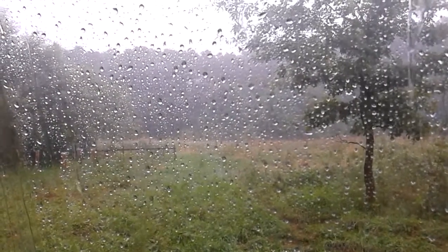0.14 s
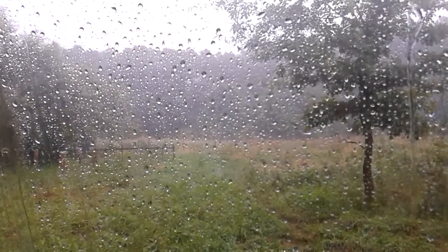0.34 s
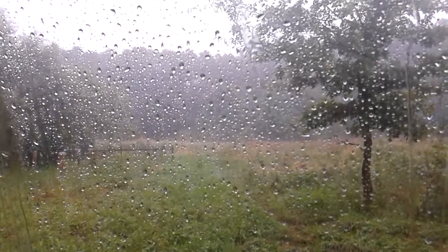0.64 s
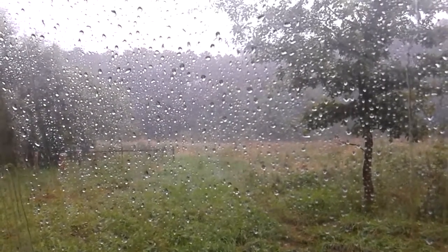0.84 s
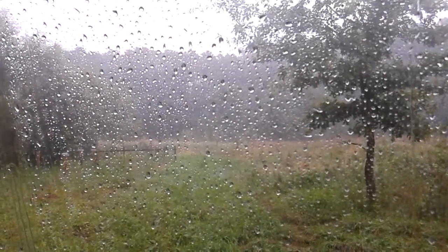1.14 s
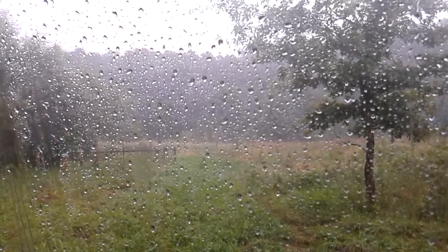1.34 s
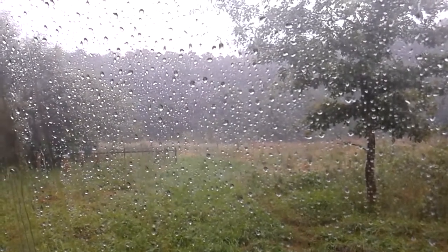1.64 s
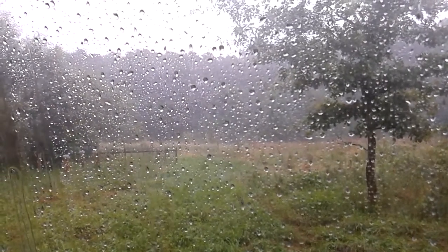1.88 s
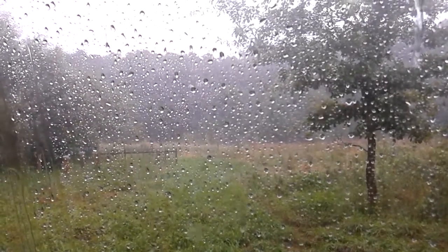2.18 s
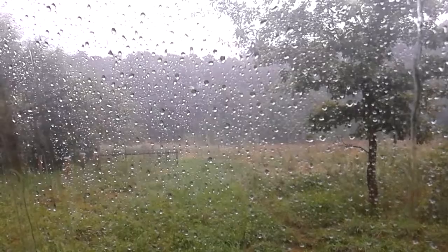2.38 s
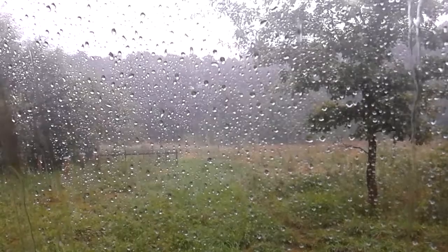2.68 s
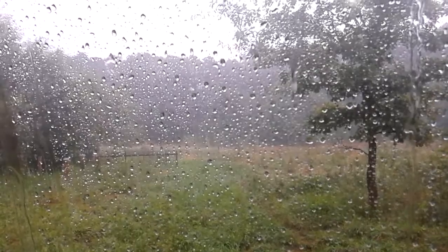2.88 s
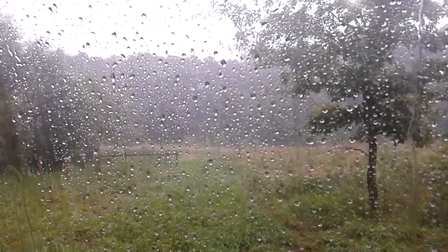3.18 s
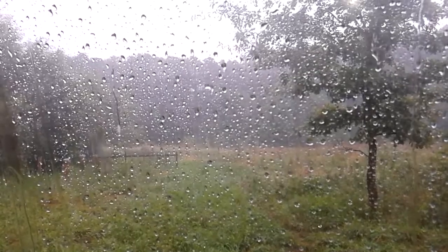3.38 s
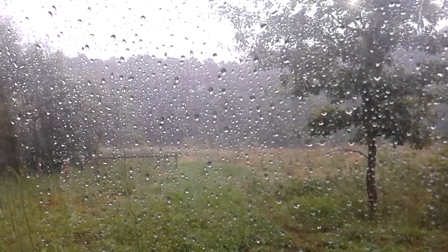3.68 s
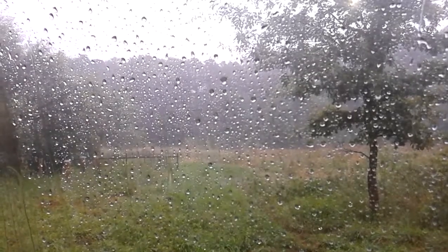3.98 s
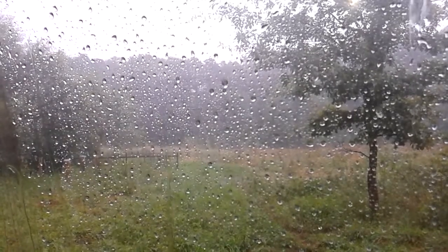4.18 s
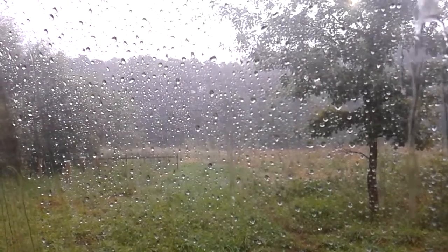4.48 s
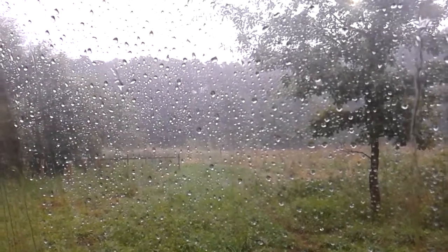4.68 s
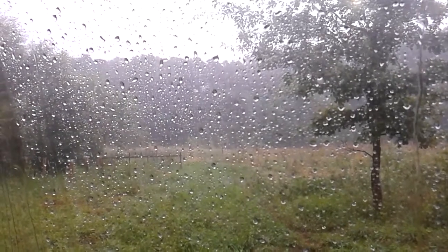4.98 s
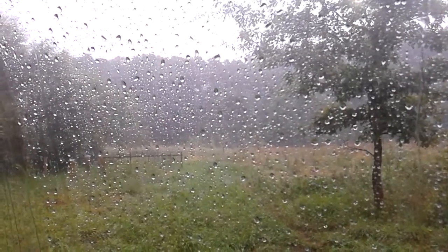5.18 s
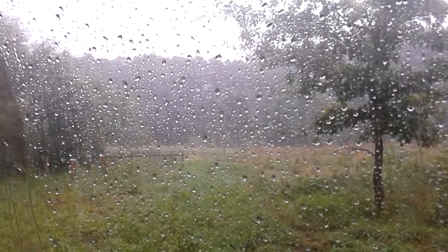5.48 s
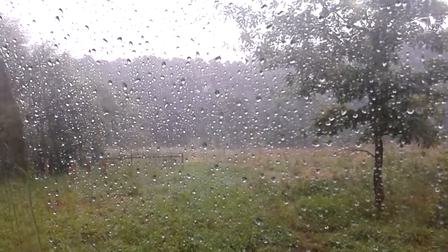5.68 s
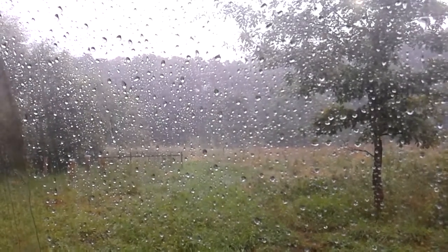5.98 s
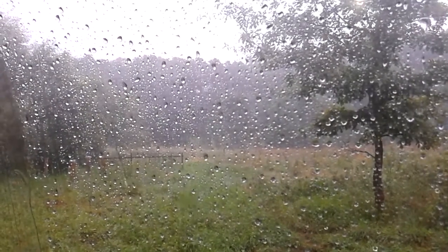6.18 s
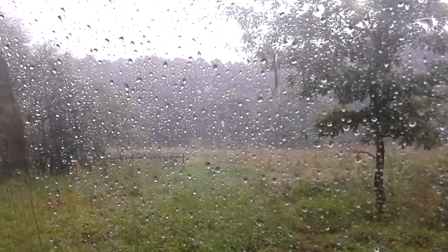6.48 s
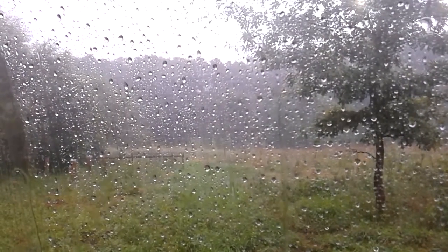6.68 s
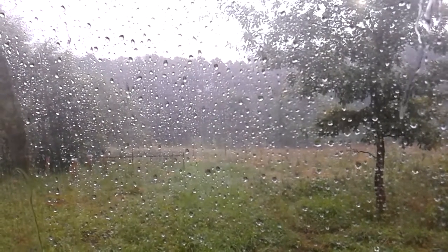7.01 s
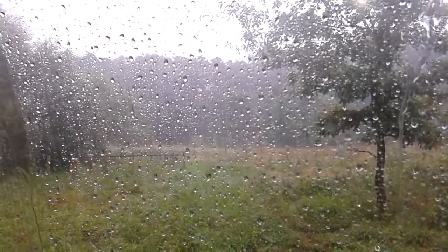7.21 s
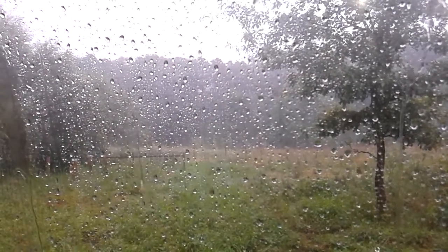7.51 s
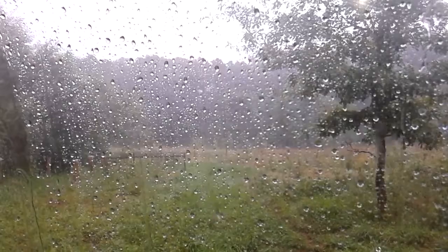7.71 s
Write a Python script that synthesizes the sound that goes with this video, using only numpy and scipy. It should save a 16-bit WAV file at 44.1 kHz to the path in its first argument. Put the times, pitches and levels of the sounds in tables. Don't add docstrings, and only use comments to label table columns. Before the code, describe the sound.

Inside a closed vehicle, a steady downpour rattles the roof and glass, punctuated by irregular hard knocks, wet smacks and small hollow booms.

```python
import sys
import numpy as np
from scipy import signal
from scipy.fft import rfft, irfft, next_fast_len
from scipy.io import wavfile
from scipy.ndimage import uniform_filter1d

SR = 44100
rng = np.random.default_rng(int(sys.argv[2]) if len(sys.argv) > 2 else 0)


def generate_wav(sig):
    pcm = np.round(np.clip(np.atleast_2d(sig).T, -1, 1) * 32767).astype(np.int16)
    wavfile.write(sys.argv[1], SR, pcm)


def voltage_ratio(level):
    return 10 ** (np.asarray(level, float) / 20)


N = 346185

# (frequency [Hz], level [dB])
ROOF_COLOUR = [(150, -27), (400, -6.5), (800, -2.5), (1700, -1.5), (3000, -6.5), (6000, -23.5),
               (12000, -43)]


def rms_one(x):
    return x / np.sqrt(np.mean(x ** 2) + 1e-20)


def at_hz(points, hz):
    table_hz, values = np.transpose(points)
    return np.interp(np.log(hz), np.log(table_hz), values)


def drift(rate_hz):
    r = np.exp(-80 * np.pi * rate_hz / SR)
    noise = rng.standard_normal(N // 40 + 2002)
    slow = signal.lfilter([1], [1, -2 * r, r * r], noise)[2000:]
    return np.interp(np.arange(N) / 40, np.arange(len(slow)), rms_one(slow))


def causal(spectrum, size):
    hz = np.maximum(np.arange(size // 2 + 1) * SR / size, 1)
    cepstrum = irfft(np.log(voltage_ratio(at_hz(spectrum, hz))), size)
    cepstrum[1:size // 2] *= 2
    cepstrum[size // 2 + 1:] = 0
    return np.exp(rfft(cepstrum))


def strikes(spectrum, t60_scale, crack):
    # (frequency [Hz], t60 [s])
    panel_t60 = [(100, 0.13), (500, 0.1), (2000, 0.099), (8000, 0.091)]
    t = np.arange(SR // 4) / SR
    scale = np.reshape(t60_scale, (-1, 1))
    white = rng.standard_normal((2, len(scale), len(t)))
    out = 0
    edges = 70 * 2 ** np.arange(0, 8.1, 1 / 3)
    for k, (low, high) in enumerate(zip(edges, edges[1:])):
        t60 = scale * at_hz(panel_t60, np.sqrt(low * high))
        dying = white[k % 2] * voltage_ratio(-60 * t / t60)
        dying /= np.linalg.norm(dying, axis=1, keepdims=True)
        dying[:, 0] += crack
        band = signal.butter(2, [low, high], "band", fs=SR, output="sos")
        out = out + signal.sosfilt(band, dying)
    size = SR // 2
    out = irfft(rfft(out, size) * causal(spectrum, size), size)[:, :len(t)]
    return out / np.linalg.norm(out, axis=1, keepdims=True)


def patter(spectrum, per_s, spread_db, clump_db, t60_scale, crack):
    places = 14
    sizes_db = spread_db * np.minimum(rng.exponential(1, N), 5) + clump_db * drift(23.3)
    sizes = voltage_ratio(sizes_db) * rng.choice([-1, 1], N)
    falls = rng.random(N) < per_s / SR
    drops = sizes * falls * (rng.integers(0, places, N) == np.arange(places)[:, None])
    voices = strikes(spectrum, np.full(places, t60_scale), crack)
    size = next_fast_len(N + voices.shape[1])
    ringing = irfft(np.sum(rfft(drops, size) * rfft(voices, size), axis=0), size)
    ringing[:size - N] += ringing[N:]
    return rms_one(ringing[:N])


def lone_drops(times, peaks_db, voices):
    out = np.zeros(N + voices.shape[1])
    for s, db, voice in zip(times, peaks_db, voices):
        start = round(s * SR)
        out[start:start + len(voice)] += voltage_ratio(db) * voice / np.abs(voice).max()
    return out[:N]


def pocks(hz):
    cycles = hz[:, None] * np.arange(SR // 20) / SR
    decay = voltage_ratio(-60 * cycles / 6.9)
    pock = np.sin(2 * np.pi * cycles) * decay * np.minimum(cycles / 0.47, 1)
    return signal.sosfilt(signal.butter(2, 300, "high", fs=SR, output="sos"), pock)


def patches(s, db, hz, octaves, rise_s, t60, count):
    t = np.arange(SR // 12) / SR
    low, high, phase = rng.random((3, len(s), count, 1))
    mode_hz = np.reshape(hz, (-1, 1, 1)) * 2 ** (octaves * (low - high))
    modes = np.sin(2 * np.pi * (mode_hz * t + phase)).sum(axis=1)
    envelope = np.minimum(t / rise_s, 1) * voltage_ratio(-60 * np.maximum(t - rise_s, 0) / t60)
    return lone_drops(s, db, modes * envelope)


def sheets(t):
    # (time [s], lift [dB], lasting [s])
    gusts = [(0.085, 3.5, 0.061), (0.26, 4.5, 0.014), (0.49, 3, 0.052), (0.57, 3, 0.061),
             (0.70, 2.5, 0.067), (0.93, 3, 0.061), (1.16, 3, 0.029), (1.53, 3.5, 0.045), (1.87, 1.5, 0.044),
             (2.01, 3.5, 0.014), (2.078, 3.5, 0.043), (2.375, 3, 0.02), (2.7, 3, 0.051), (2.8, 3.5, 0.071),
             (3.48, 4, 0.025), (3.628, 4.5, 0.096), (3.851, 4, 0.042), (4.1, 4.5, 0.045), (4.18, 3, 0.062),
             (4.34, 1.5, 0.019), (4.438, 5, 0.02), (4.88, 6.5, 0.095), (5.13, 1.5, 0.089),
             (5.64, 2.5, 0.082), (5.84, 3, 0.15), (6.1, 3, 0.11), (6.17, 2, 0.084), (6.43, 2.5, 0.055),
             (6.731, 1.5, 0.086), (7.15, 4, 0.017)]
    rise_s, fall_s = 0.008, 0.02
    start, db, lasting = np.transpose(gusts)[:, :, None]
    rise = np.clip((t - start) / rise_s, 0, 1)
    fall = np.exp(-np.maximum(t - start - lasting, 0) / fall_s)
    return np.max(db * rise * fall, axis=0)


def lulls(t):
    # (end time [s], depth [dB], negative for a swell, lasting [s])
    gaps = [(0.568, 4, 0.028), (0.686, 5, 0.023), (0.942, 2, 0.037), (1.135, 2, 0.032), (1.535, 4.5, 0.055),
            (1.80, 0.5, .06), (2.0, 3.5, 0.071), (2.376, 2.5, 0.059), (3.368, 4, 0.03), (3.63, 0, .03),
            (3.855, 1, 0.046), (4.09, 1.5, .04), (4.883, 3, 0.034), (5.137, -2, .04), (5.5, -2, 0.034),
            (5.84, 1.5, 0.073), (5.895, 3, 0.011), (6.108, 0.5, 0.057), (6.435, 0.5, 0.031),
            (6.72, 4.5, .06), (6.968, 0.5, .04), (7.33, 1, 0.08), (7.604, 3, 0.075)]
    end, db, lasting = np.transpose(gaps)[:, :, None]
    return -np.sum(db * np.clip(1 - (end - t) / lasting, 0, 1) * (t < end), axis=0)


def downpour():
    # (time [s], drumming level [dB])
    strength = [(0.0, -24), (0.94, -23), (1.66, -25), (2.23, -22.5), (2.62, -23), (3.21, -24.5),
                (3.65, -24), (4.37, -22.5), (4.72, -25), (4.94, -26.5), (5.07, -22.5), (5.992, -26),
                (6.27, -23), (7.41, -25), (7.56, -22.5), (7.85, -24)]
    # (frequency [Hz], level [dB per Hz])
    panel_colour = [(53, -57), (90, -25), (118, -12), (292, -8), (340, -2), (429, -3), (721, 1),
                    (1000, -1.5), (1530, -3), (1650, -1), (3710, -12), (4600, -20.5), (5500, -22),
                    (6000, -26.5), (6870, -31.5), (9000, -35.5), (11700, -53), (19800, -70.5)]
    # (frequency [Hz], level [dB per Hz])
    glass_colour = [(1500, -29.5), (4000, 1.5), (6900, -11), (8490, -7.5), (10800, -15.5), (13700, -22),
                    (14700, -16.5), (15800, -19)]
    t = np.arange(N) / SR
    coarse_t = t[::32]
    s, floor_db = np.transpose(strength)
    drum_db = np.interp(t, s, floor_db) + np.interp(t, coarse_t, sheets(coarse_t) + lulls(coarse_t))
    mean_db = drum_db.mean()
    spray_db = mean_db - 21 + 1.05 * (drum_db - mean_db)
    drumming = patter(panel_colour, per_s=2500, spread_db=3.0, clump_db=1.0, t60_scale=0.84, crack=0.25)
    spray = patter(glass_colour, per_s=4500, spread_db=5.0, clump_db=3.5, t60_scale=0.61, crack=0.64)
    return voltage_ratio(drum_db) * drumming + voltage_ratio(spray_db) * spray


def thuds():
    # (time [s], peak level [dB])
    heavy = [(0.003, -4), (0.092, -6), (0.22, 1), (0.276, -10), (0.505, -1), (0.517, 1.5), (0.526, -2),
             (0.686, -0.5), (0.944, -2), (1.165, -17), (1.404, -3), (1.886, -4), (2.398, -4), (2.463, 1.5),
             (2.526, -4), (2.667, 0), (2.838, -15), (3.369, 1), (3.567, 1.5), (3.888, 3), (4.008, -2.5),
             (4.196, 0), (4.571, 0.5), (5.138, 1.5), (5.491, -1.5), (5.602, -6), (5.896, -17), (6.106, -3),
             (6.118, 3.5), (6.216, -7), (6.251, 4), (6.439, -2), (6.757, 0.5), (6.836, -6), (6.969, -1.5),
             (7.453, -6), (7.605, 1.5)]
    lesser_per_s, lesser_db = 10, -35
    s, db = np.transpose(heavy)
    ring_scale = 1.6 * (1 + 0.1 * rng.uniform(-0.92, 1, len(s)))
    voices = strikes(ROOF_COLOUR, ring_scale, crack=0.14)
    count = round(lesser_per_s * N / SR)
    when = rng.random(count) * N / SR
    lesser = lone_drops(when, np.full(count, lesser_db), voices[np.arange(count) % len(s)])
    return lone_drops(s, db - 12.5, voices) + lesser


def knocks():
    # (time [s], peak level [dB], pitch [Hz])
    square_hits = [(0.093, -7, 1540), (0.22, -10, 721), (0.331, -10, 1260), (0.488, -11, 1690),
                   (0.506, -6, 1570), (0.571, -7, 720), (0.687, -12, 1060), (0.856, -19, 1440),
                   (0.946, -15, 570), (1.167, -10, 1730), (1.236, -13, 740), (1.537, -13, 1540),
                   (1.678, -10, 850), (1.868, -12, 965), (1.887, -8, 1840), (1.969, -8.5, 1890),
                   (2.004, -18, 716), (2.023, -20, 746), (2.378, -22, 710), (2.464, -13.5, 501),
                   (2.526, -7, 1480), (2.708, -21, 783), (2.812, -18, 565), (3.369, -7, 820),
                   (3.576, -15, 896), (3.632, -18, 570), (3.859, -11, 610), (3.958, -7, 1260),
                   (4.014, -8.5, 662), (4.059, -16, 711), (4.094, -8, 1470), (4.195, -11, 1860),
                   (4.324, -13, 1700), (4.362, -11, 1060), (4.449, -18, 770), (4.533, -19, 1570),
                   (4.663, -12, 1290), (4.885, -9, 750), (5.096, -15, 563), (5.138, -1.5, 2080),
                   (5.302, -10, 935), (5.503, -5, 1500), (5.553, -19, 710), (5.709, -9, 1760),
                   (5.844, -12, 1060), (5.896, -5.5, 1690), (5.926, -12, 1380), (6.114, -9, 1270),
                   (6.165, -12, 1320), (6.184, -6, 1130), (6.218, -5, 740), (6.252, -14, 523),
                   (6.443, -4, 1310), (6.554, -15, 600), (6.725, -22, 1730), (6.97, -9, 1320),
                   (7.416, -9, 1550), (7.452, -13, 592), (7.605, -6, 1580), (7.658, -6, 1840)]
    level_db, ring_db, lag_s = -3.5, -8, 0.000794
    lesser_per_s, lesser_db = 70, -21
    s, db, hz = np.transpose(square_hits)
    pock = pocks(hz)
    ring = strikes(ROOF_COLOUR, np.full(len(s), 0.3), crack=0.15)
    when, size = rng.random((round(lesser_per_s * N / SR), 2)).T
    lesser = lone_drops(when * N / SR, lesser_db - 8 * size, pock[np.arange(len(when)) % len(s)])
    cracks = lone_drops(s + lag_s, db + level_db, pock)
    return cracks + lone_drops(s, db + level_db + ring_db, ring) + lesser


def ticks():
    # (time [s], peak level [dB], pitch [Hz])
    hard_drops = [(0.0881, -13, 1510), (0.4854, -15, 1140), (0.5265, -8, 1180), (0.5404, -10, 800),
                  (0.6996, -10, 1730), (0.7165, -14, 920), (0.756, -14, 800), (1.885, -10, 850),
                  (2.023, -14, 1980), (2.1854, -13, 900), (2.3796, -11, 1950), (2.5271, -5, 1410),
                  (2.687, -16, 1870), (3.881, -11, 1120), (4.2132, -13, 820), (4.6785, -14, 1610),
                  (4.983, -16, 1170), (4.993, -9, 1540), (5.0056, -9, 1990), (5.1354, -15, 1020),
                  (5.262, -15, 880), (5.4107, -10, 1860), (6.118, -8, 1610), (6.4477, -8, 1350)]
    s, db, hz = np.transpose(hard_drops)
    return lone_drops(s, db, pocks(hz))


def splashes():
    # (time [s], peak level [dB])
    bursts = [(0.2204, -32.5), (0.6818, -52), (0.9423, -28), (1.0321, -23.5), (1.1403, -41), (1.5314, -28),
              (1.6811, -30), (1.8815, -39), (2.0098, -39), (2.0218, -24.5), (2.2308, -27), (2.3795, -35),
              (2.576, -24), (2.8005, -33), (3.044, -31), (3.471, -27), (3.5309, -36), (3.5708, -27),
              (4.0033, -33), (4.0916, -35), (4.1205, -25), (4.3495, -27), (4.3979, -43), (4.4518, -39),
              (4.4887, -43), (4.569, -28), (4.6593, -47), (4.8838, -40), (4.954, -14.5), (5.2265, -37),
              (5.5338, -45), (5.8416, -41), (5.9324, -43), (6.0192, -41), (6.106, -26.5), (6.177, -26),
              (6.2566, -25), (6.5505, -43), (6.7226, -38), (6.759, -35), (6.8623, -26), (6.9691, -30),
              (7.162, -44), (7.207, -46), (7.2873, -32), (7.415, -44), (7.4639, -31), (7.5063, -33),
              (7.6047, -30), (7.6934, -55), (7.7672, -42)]
    # (frequency [Hz], level [dB])
    splash_colour = [(1500, -16), (4000, 5), (8000, -0.5), (12000, -0.5), (14000, -5), (16000, -6)]
    rise_s = 0.0067
    s, db = np.transpose(bursts)
    voices = strikes(splash_colour, np.full(len(s), 1.5), crack=0.03)
    rise = np.minimum(np.arange(voices.shape[1]) / SR / rise_s, 1)
    return lone_drops(s - rise_s / 2, db - 2.0, voices * rise)


def smacks():
    # (time [s], peak level [dB])
    flat_drops = [(0.025, -28), (0.08, -35), (0.484, -28), (0.516, -29), (0.594, -30), (0.695, -26),
                  (0.724, -31), (0.953, -28), (1.683, -26), (2.026, -22.5), (2.059, -29.5), (2.376, -21),
                  (2.468, -19), (2.578, -25), (2.734, -29), (2.802, -29.5), (3.643, -21), (3.718, -28),
                  (3.744, -26), (3.859, -26), (3.889, -29), (3.963, -28), (4.121, -32), (4.421, -29),
                  (4.45, -23.5), (4.889, -24), (4.952, -23), (5.0, -24.5), (5.139, -24), (5.225, -23),
                  (5.261, -25), (5.663, -22), (5.858, -29), (5.966, -27.5), (6.106, -29.5), (6.186, -24),
                  (6.222, -29.5), (6.262, -26), (6.322, -26), (6.752, -27), (7.611, -29), (7.688, -26)]
    s, db = np.transpose(flat_drops)
    return patches(s, db + 3.0, hz=3524, octaves=0.8, rise_s=0.0062, t60=0.066, count=60)


def rings():
    # (time [s], peak level [dB], pitch [Hz])
    roof_drops = [(0.0, -15.5, 722), (0.027, -16, 1525), (0.099, -17, 1136), (0.148, -23, 720),
                  (0.272, -13, 2026), (0.519, -14, 594), (0.545, -14, 1484), (0.725, -16, 1150),
                  (0.771, -21, 644), (0.916, -15.5, 1580), (0.949, -21, 660), (1.052, -16, 685),
                  (1.681, -19, 850), (1.885, -19, 1900), (2.023, -18, 800), (2.074, -15, 960),
                  (2.236, -23, 650), (2.476, -19, 470), (2.527, -19, 1530), (2.733, -22, 1340),
                  (2.758, -23, 727), (3.422, -17, 606), (3.582, -23, 2160), (3.66, -17, 820),
                  (3.707, -15, 744), (3.745, -14.5, 1144), (3.87, -15, 1595), (4.145, -14, 930),
                  (4.191, -15, 1856), (4.396, -25, 400), (4.47, -15, 1290), (4.899, -17, 670),
                  (4.982, -15, 930), (5.015, -23, 494), (5.169, -14.5, 2000), (5.234, -15, 810),
                  (5.267, -18, 1480), (5.481, -15.5, 710), (5.593, -16, 540), (5.668, -21, 860),
                  (5.897, -16, 923), (6.105, -21, 587), (6.169, -15, 690), (6.215, -17, 760),
                  (6.26, -15.5, 534), (6.44, -20, 1830), (6.755, -14.5, 760), (7.455, -17, 530),
                  (7.596, -18, 1540), (7.68, -17, 1346)]
    s, db, hz = np.transpose(roof_drops)
    return patches(s, db + 0.9, hz, octaves=1.1, rise_s=0.0024, t60=0.075, count=30)


def booms():
    # (time [s], peak level [dB], pitch [Hz])
    soft_drops = [(0.036, -23, 380), (0.096, -27, 434), (0.281, -22.5, 390), (0.521, -24, 498),
                  (0.577, -24.5, 332), (0.645, -26, 410), (0.711, -26, 414), (1.992, -22, 470),
                  (2.066, -26, 362), (2.282, -26, 480), (2.474, -25, 493), (2.586, -24, 452),
                  (2.903, -28, 380), (3.039, -23, 478), (3.274, -24, 435), (3.44, -27, 470),
                  (3.497, -23, 400), (3.549, -23, 426), (3.606, -27, 500), (3.651, -26, 468),
                  (3.691, -21, 379), (3.865, -27, 364), (4.124, -26, 343), (4.263, -26, 336),
                  (4.337, -26, 405), (4.393, -25, 413), (4.603, -25, 360), (5.016, -25, 370),
                  (5.141, -24, 398), (5.198, -26, 385), (5.469, -24, 351), (5.502, -27, 470),
                  (5.588, -26, 493), (5.715, -20.5, 357), (6.468, -21, 337), (6.759, -23, 407),
                  (7.097, -26, 398), (7.432, -24, 474), (7.556, -23, 471), (7.776, -26, 360)]
    s, db, hz = np.transpose(soft_drops)
    return patches(s, db + 0.53, hz, octaves=0.8, rise_s=0.015, t60=0.16, count=12)


def rumble():
    # (frequency [Hz], level [dB per Hz])
    shell_colour = [(12, -45), (20, -21), (43, 1), (75, -8), (110, -6), (140, -29), (240, -120)]
    hz = np.maximum(np.arange(N // 2 + 1) * SR / N, 1)
    shaking = irfft(rfft(rng.standard_normal(N)) * voltage_ratio(at_hz(shell_colour, hz)), N)
    return voltage_ratio(-62.5) * rms_one(shaking)


def cabin(x):
    # (frequency [Hz], width [Hz], gain [dB])
    resonances = [(260.7, 17.7, 7.5), (334.6, 19, 2.5), (421, 10, 2.5), (565, 19, 5.5), (720, 22, 3),
                  (870, 120, -1), (1020, 70, -2), (1450, 22, -0.5), (1543, 43, 6), (1643, 47, -7),
                  (1690, 49, 2), (2070, 35, 3.5), (2235, 150, 1.5), (2304, 100, -1.5), (2275, 64, 0),
                  (3080, 340, -2), (3440, 160, 0.9), (7650, 36, -10), (14550, 50, 6)]
    for hz, width_hz, db in resonances:
        middle = -2 * np.cos(2 * np.pi * hz / SR)
        a, lift = np.pi * width_hz / SR, np.sqrt(voltage_ratio(db))
        x = signal.lfilter([1 + a * lift, middle, 1 - a * lift], [1 + a / lift, middle, 1 - a / lift], x)
    return x


def power_db(band, axis=None):
    return 10 * np.log10(np.mean(abs(band) ** 2, axis=axis) + 1e-20)


def thin(spec, hz, size, shares, frame_luck, levelling, lingers):
    out = spec.copy()
    for low in range(160, 750, size):
        band = spec[low:low + size]
        db = power_db(band, axis=0)
        chance = signal.lfilter([1], [1, -lingers], rng.standard_normal(len(db)))
        claim = db + frame_luck + 5 * rms_one(chance)
        share = np.clip(at_hz(shares, hz[low + size // 2]), 0, 0.95)
        evened = voltage_ratio(levelling * min(3 * share, 1) * (power_db(band) - db))
        out[low:low + size] = band * evened * (claim >= np.quantile(claim, share))
    return out


def flickering_treble(x):
    # (frequency [Hz], share of frames [0-1])
    lost_bands = [(6300, 0.0), (8500, 0.03), (9600, .06), (10300, .2), (10800, .42), (12500, .48),
                  (13600, .75), (14200, .75), (14700, .36), (15300, .62), (15700, .85)]
    # (frequency [Hz], share of frames [0-1])
    lost_slits = [(4500, 0), (5200, .08), (6000, 0.3), (6600, .24), (7500, 0.17), (10000, .17), (16000, .2)]
    # (time [s], lasting [s], luck [dB])
    treble_spells = [(0.0, 0.023, 8), (0.008, 0.023, -8), (0.077, 0.023, 8), (0.147, 0.046, 8),
                     (0.286, 0.07, -7), (0.472, 0.07, -9), (0.565, 0.07, 12), (0.797, 0.023, -10),
                     (1.006, 0.116, 8), (1.378, 0.046, -8), (1.447, 0.023, -7), (1.494, 0.023, -8),
                     (1.517, 0.046, 6), (1.796, 0.046, -9), (1.865, 0.046, -9), (1.958, 0.046, -10),
                     (2.005, 0.139, 12), (2.167, 0.046, 16), (2.237, 0.023, 8), (2.306, 0.023, 13),
                     (2.423, 0.023, -17), (2.562, 0.046, 8), (2.655, 0.116, 9), (2.957, 0.023, 8),
                     (3.073, 0.046, 10), (3.119, 0.023, -8), (3.189, 0.023, -6), (3.235, 0.023, -8),
                     (3.351, 0.023, 12.5), (3.421, 0.023, -10), (3.467, 0.046, 8), (3.537, 0.023, 12),
                     (3.7, 0.046, -15), (3.978, 0.023, 6), (4.164, 0.046, 8), (4.466, 0.023, -12),
                     (4.582, 0.023, 8), (4.628, 0.023, -10), (4.698, 0.023, -9), (4.791, 0.07, -8),
                     (4.93, 0.07, 10), (5.07, 0.046, 10), (5.186, 0.023, -6), (5.441, 0.023, 10),
                     (5.488, 0.046, -10), (5.673, 0.023, 12), (5.72, 0.093, -8), (5.882, 0.046, -16),
                     (5.998, 0.046, -8), (6.277, 0.023, 10), (6.416, 0.023, -0.5), (6.579, 0.023, -8),
                     (6.649, 0.07, -9), (6.834, 0.046, 8), (6.927, 0.023, -11), (7.02, 0.023, 8),
                     (7.043, 0.116, -7.5), (7.183, 0.046, -6), (7.252, 0.023, -8), (7.322, 0.023, -14)]
    frame = 2048
    lead = frame // 2 - 850
    hz, t, spec = signal.stft(np.pad(x, (lead, 0)), SR, "cosine", frame)
    start, lasting, luck_db = np.transpose(treble_spells)[:, :, None]
    inside = abs(t - lead / SR - start - lasting / 2) < lasting / 2
    luck = 1.1 * np.sum(luck_db * inside, axis=0) + 2.5 * rng.standard_normal(spec.shape[1])
    spec[hz > 15800] = 0
    spec = thin(spec, hz, 32, lost_bands, luck, levelling=0.48, lingers=0.3)
    spec = thin(spec, hz, 4, lost_slits, -power_db(spec[160:320], axis=0), levelling=0, lingers=0.2)
    around = np.sqrt(uniform_filter1d(abs(spec) ** 2, size=24, axis=0))
    spec = spec * ((abs(spec) > 0.78 * around) | (hz[:, None] < 4900))
    return signal.istft(spec, SR, "cosine", frame)[1][lead:lead + N]


def scene():
    outside = downpour() + thuds() + knocks() + splashes()
    singles = ticks() + smacks() + rings() + booms()
    return (cabin(outside) + singles + rumble())[None]


def roll_off(x):
    return signal.sosfilt(signal.butter(12, 15940, fs=SR, output="sos"), x)


def record(dry):
    mix = flickering_treble(dry[0])[None]
    return roll_off(mix)


dry = scene()
out = record(dry)
generate_wav(out)
```